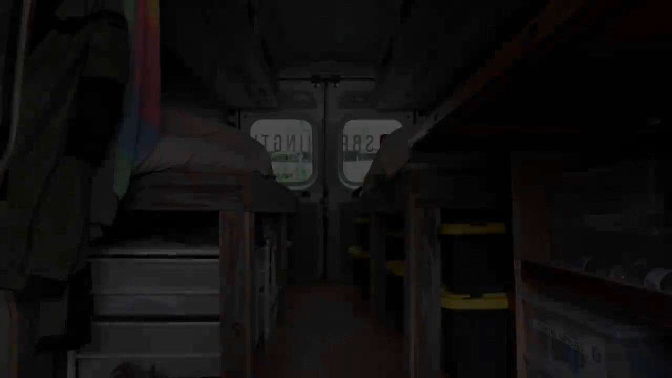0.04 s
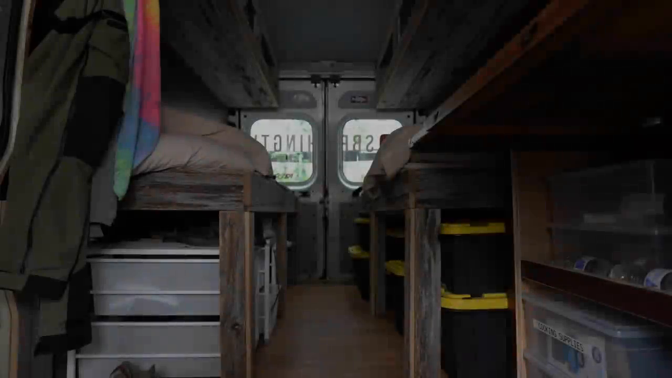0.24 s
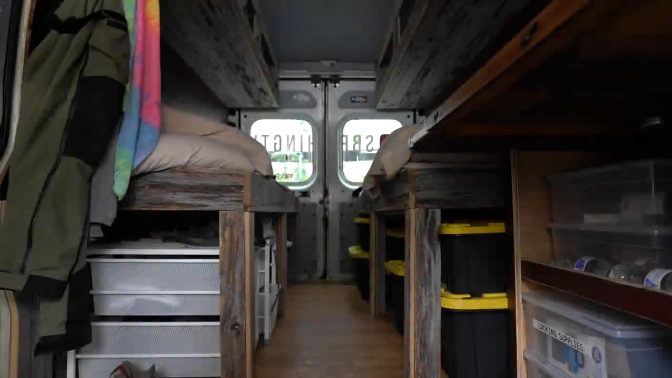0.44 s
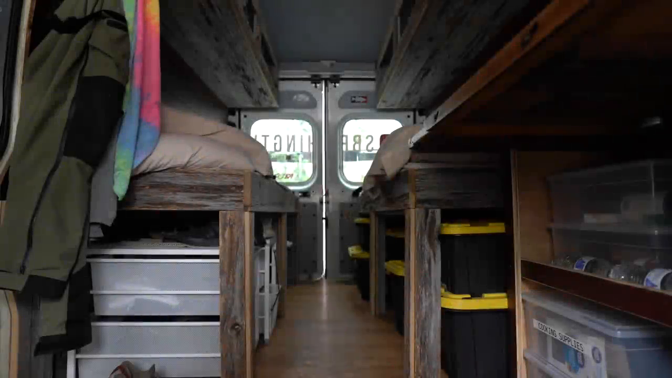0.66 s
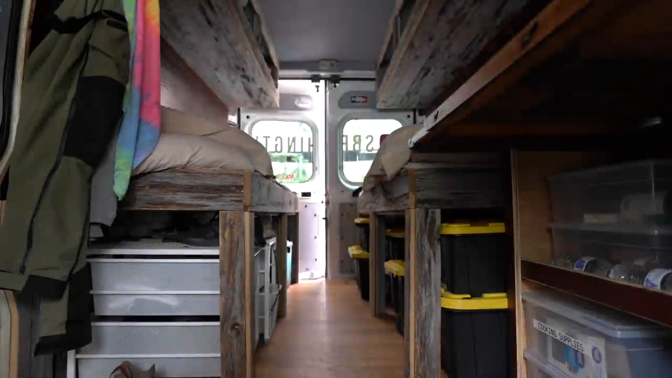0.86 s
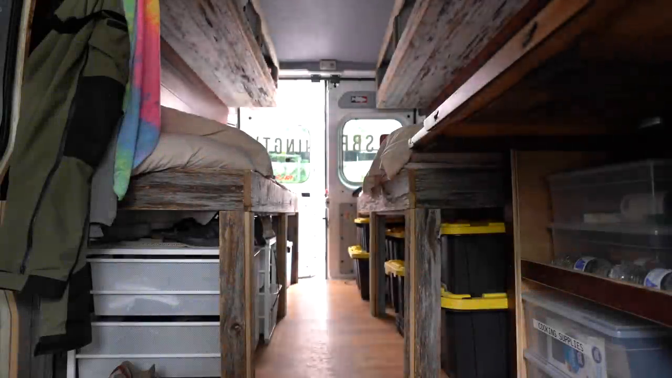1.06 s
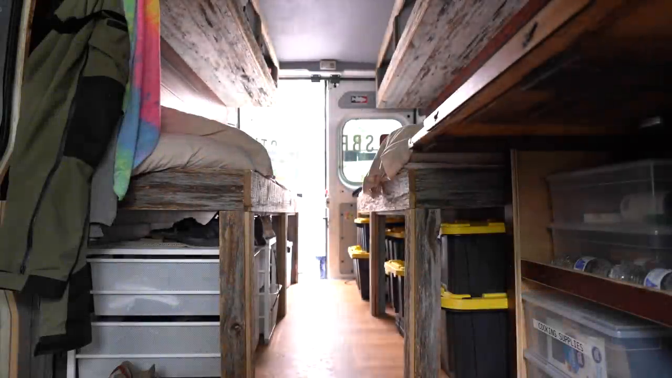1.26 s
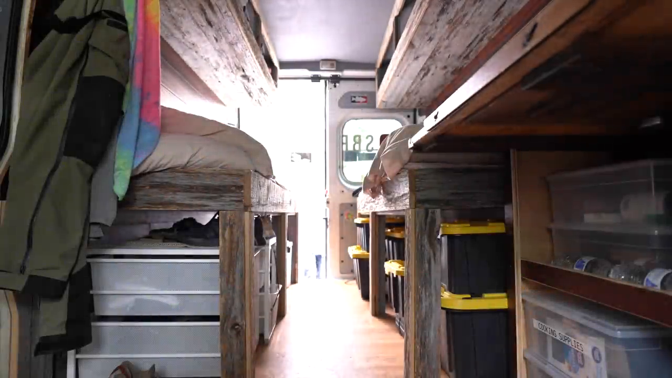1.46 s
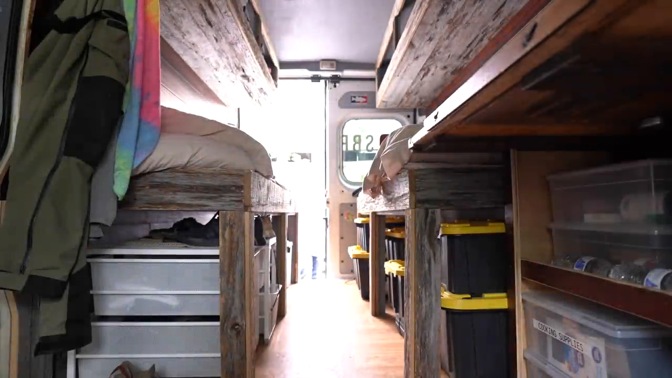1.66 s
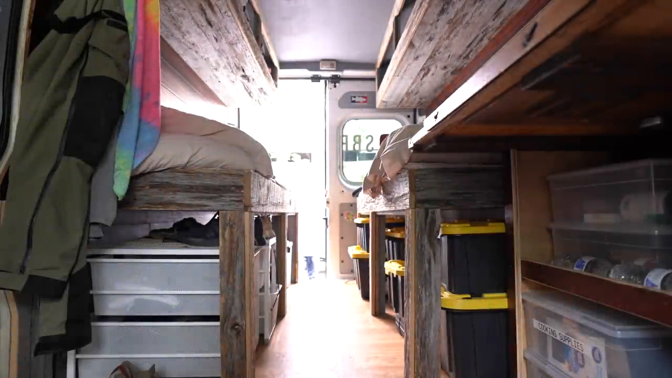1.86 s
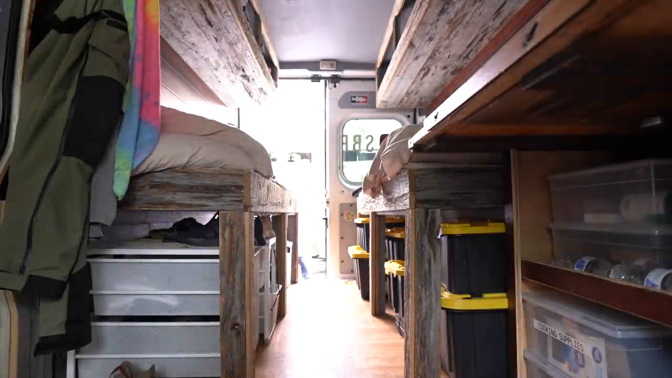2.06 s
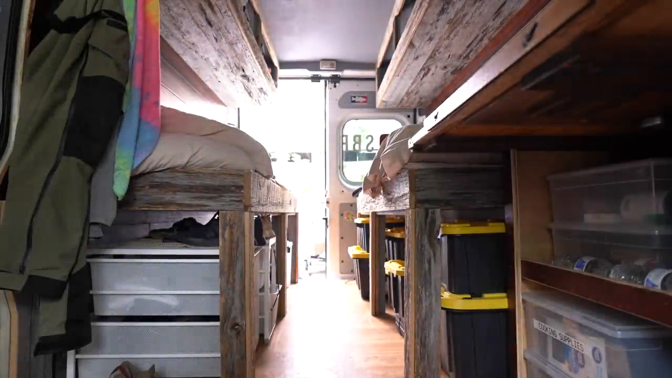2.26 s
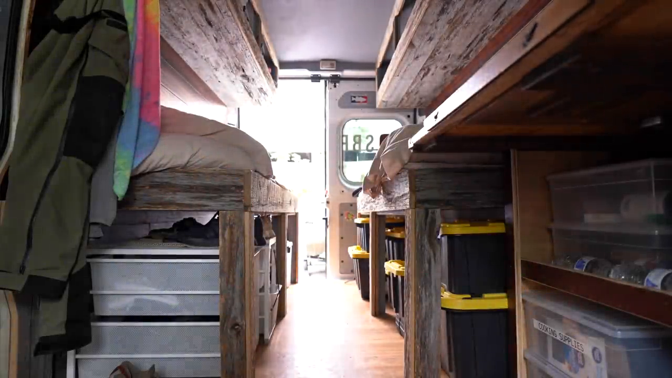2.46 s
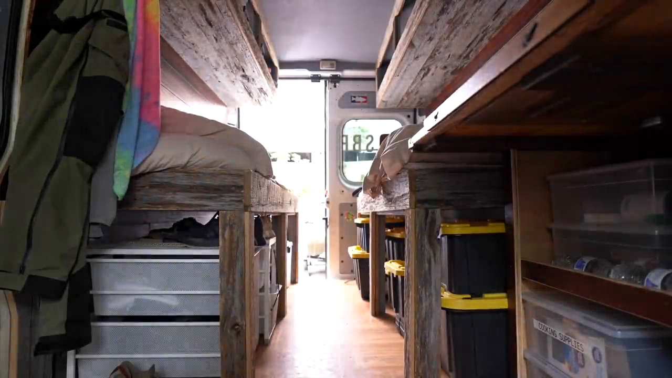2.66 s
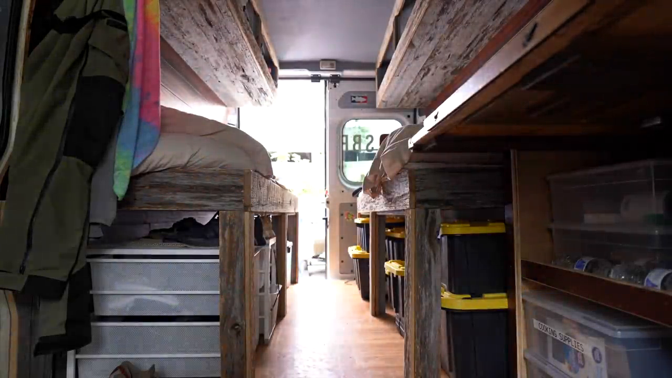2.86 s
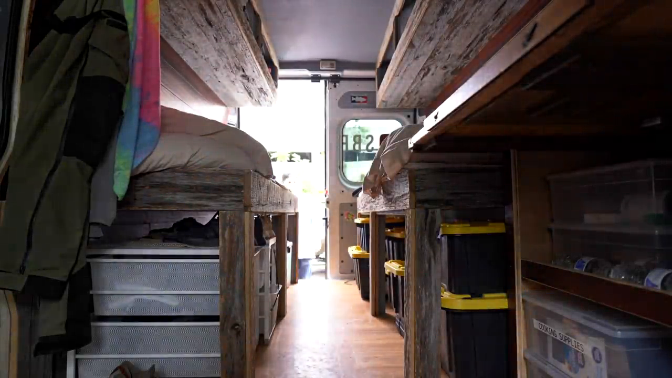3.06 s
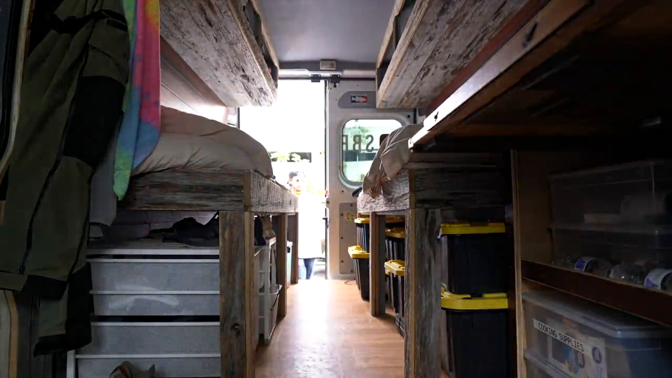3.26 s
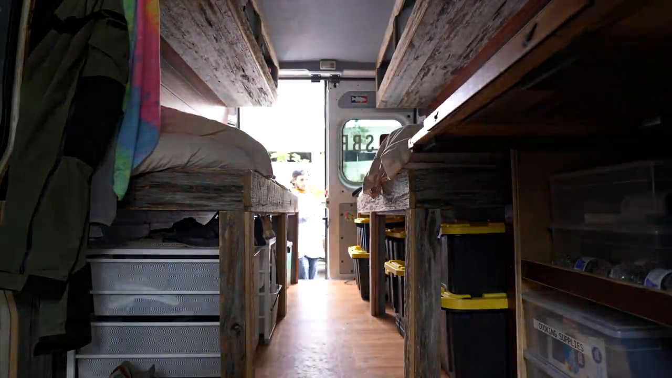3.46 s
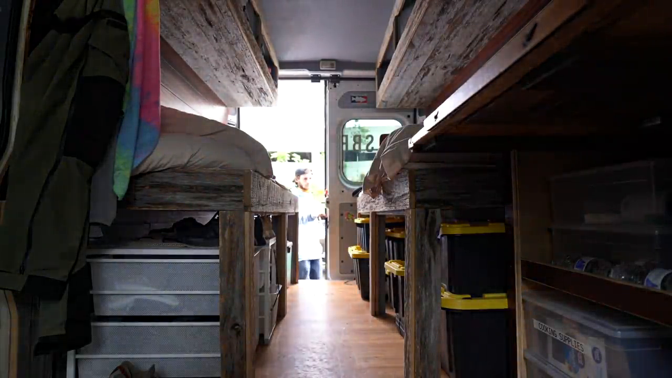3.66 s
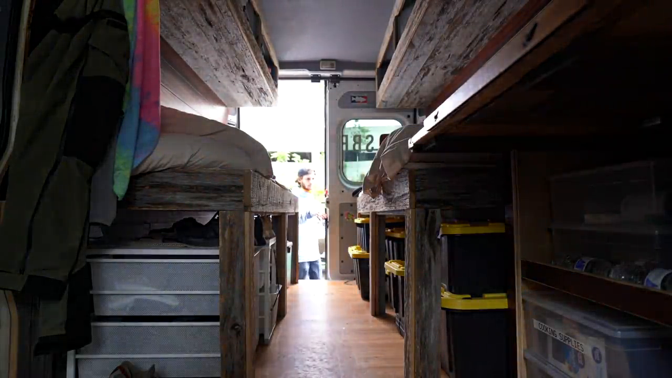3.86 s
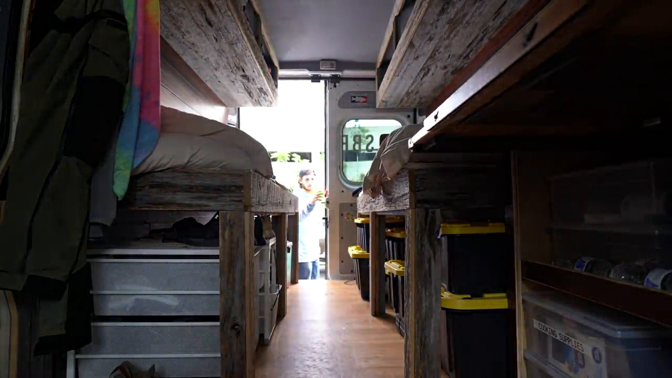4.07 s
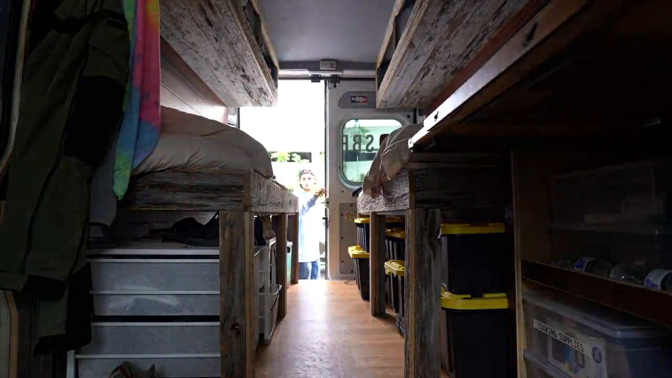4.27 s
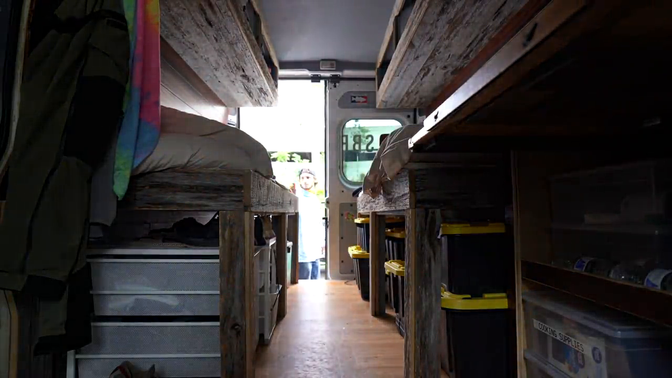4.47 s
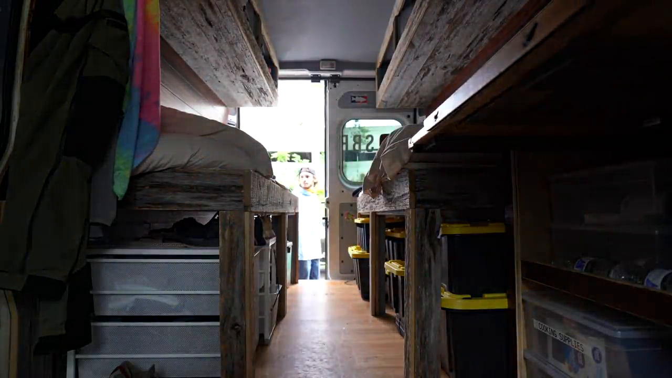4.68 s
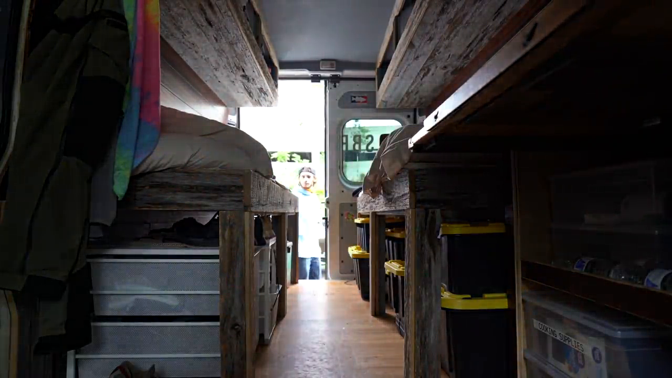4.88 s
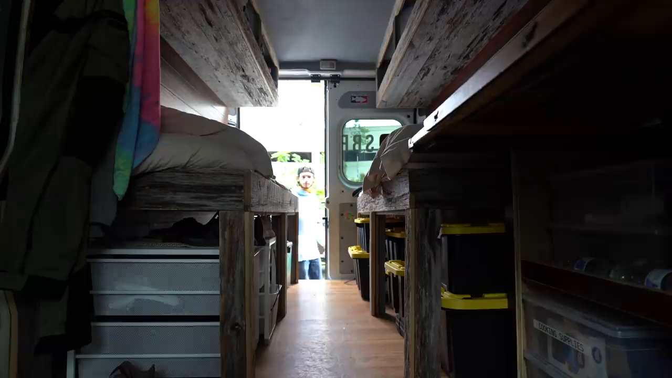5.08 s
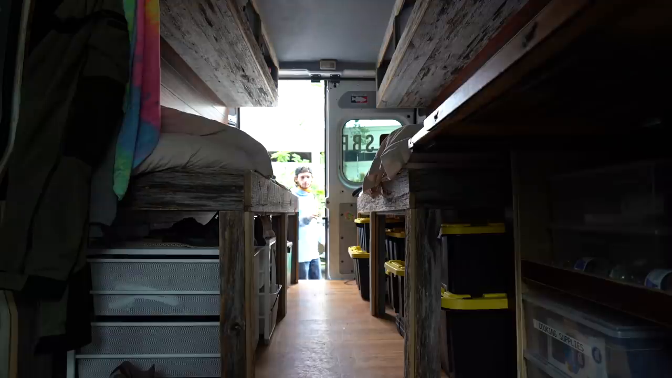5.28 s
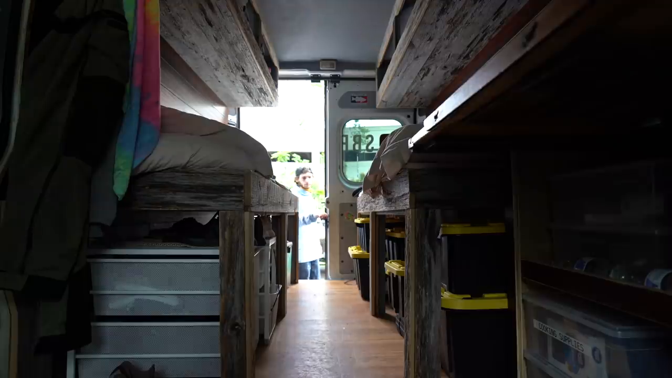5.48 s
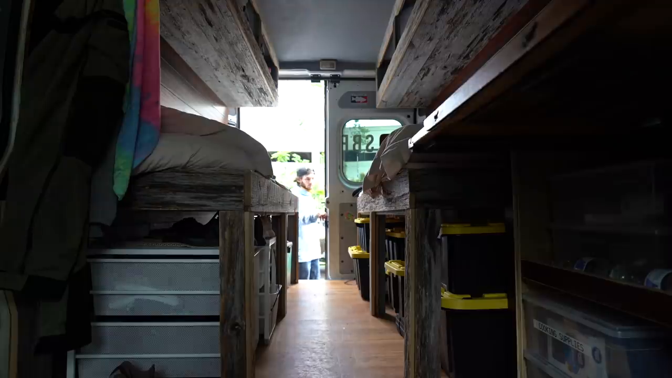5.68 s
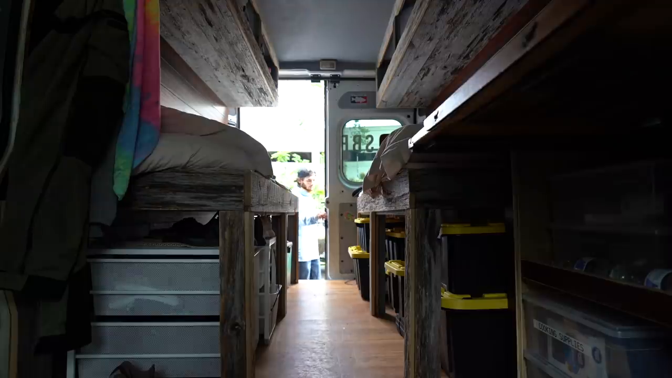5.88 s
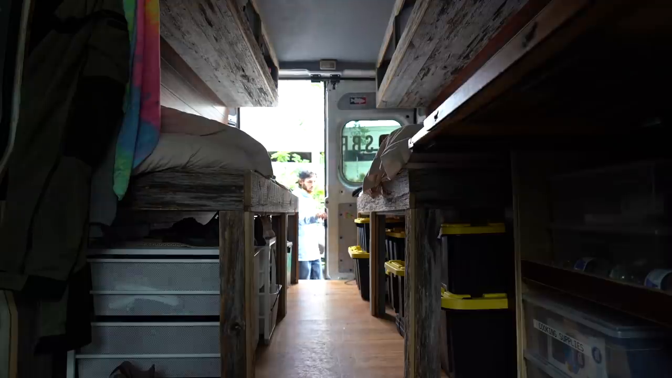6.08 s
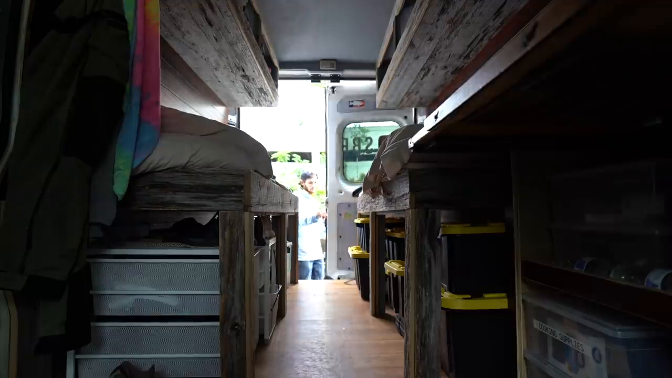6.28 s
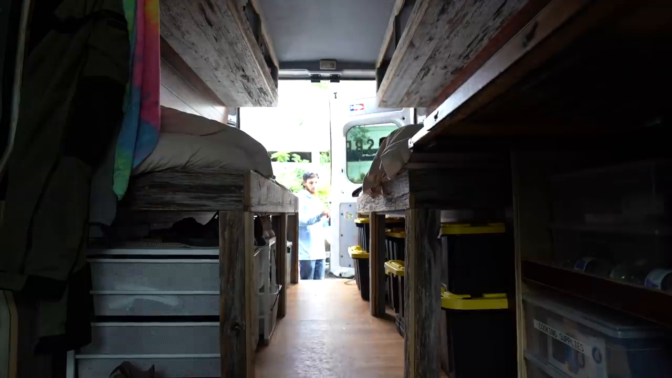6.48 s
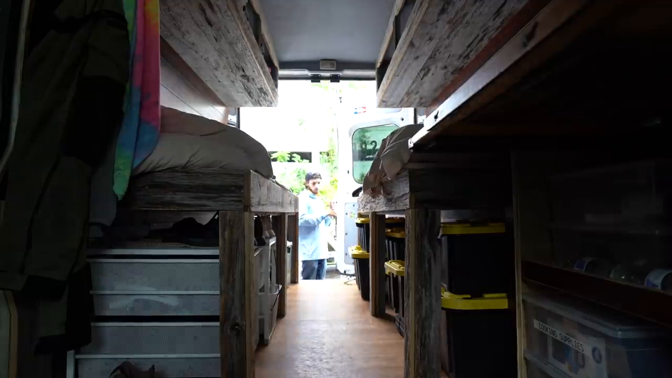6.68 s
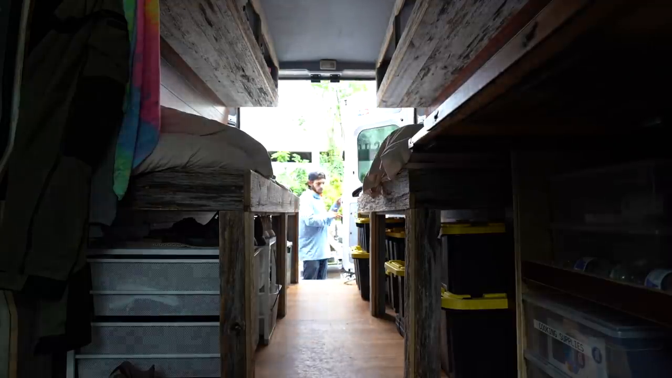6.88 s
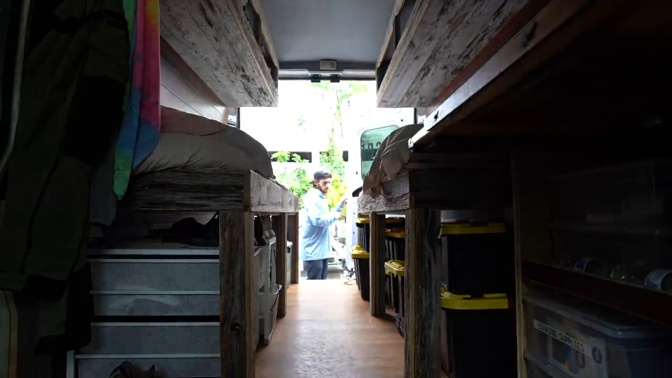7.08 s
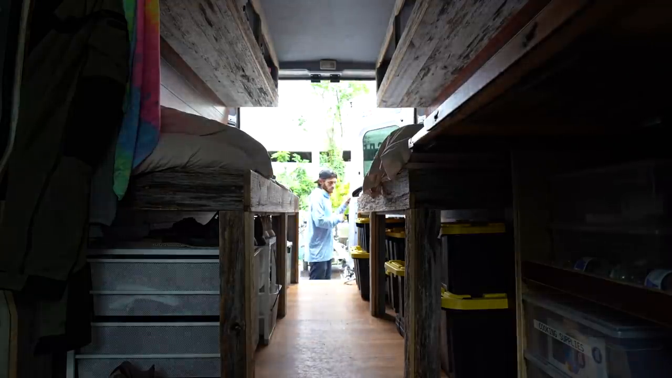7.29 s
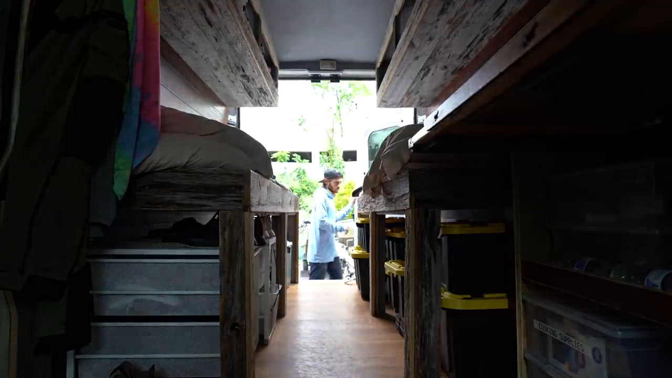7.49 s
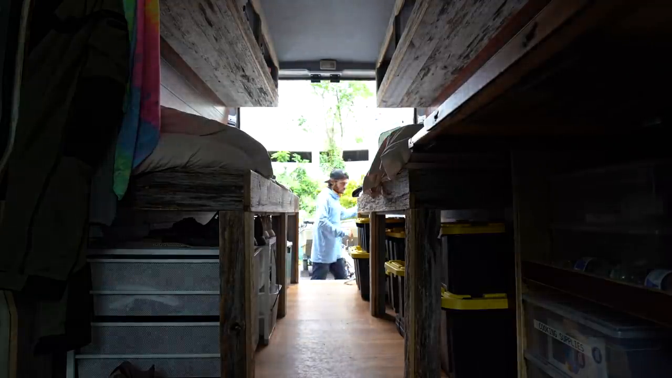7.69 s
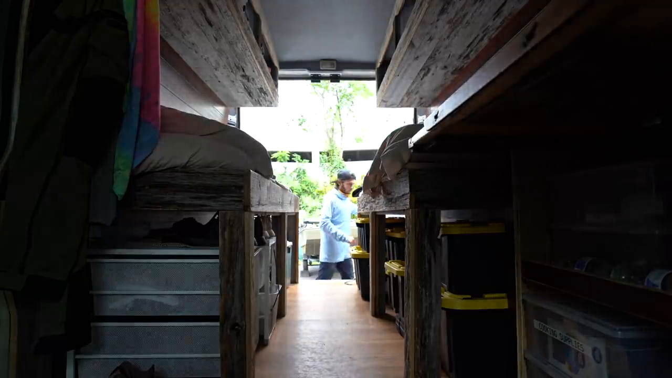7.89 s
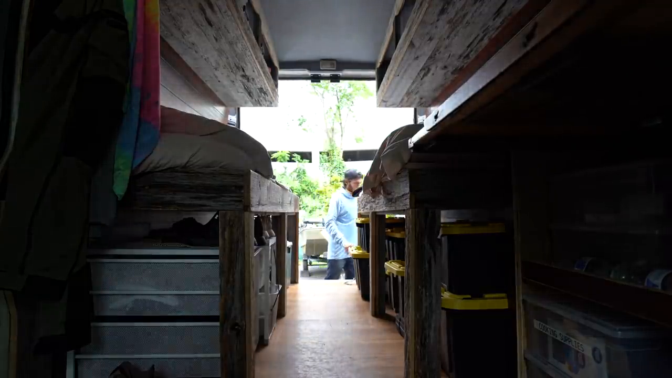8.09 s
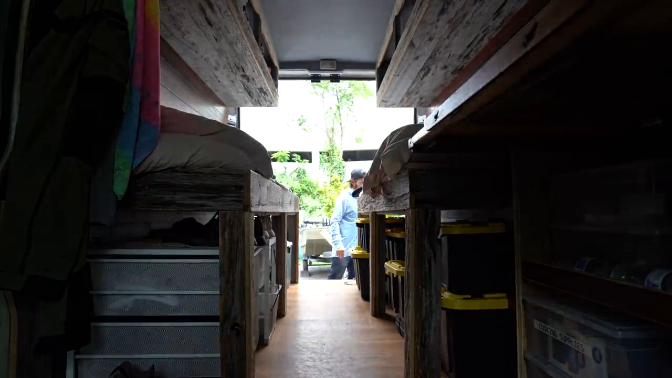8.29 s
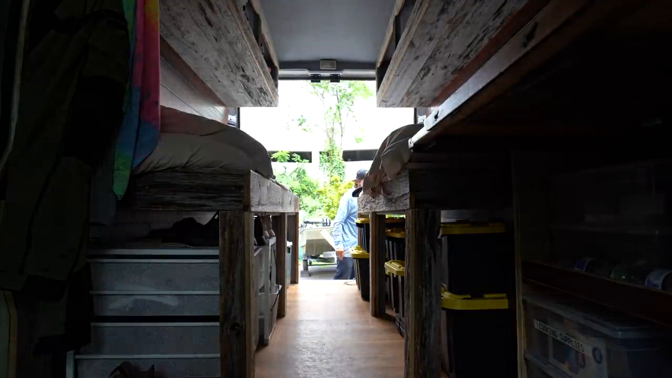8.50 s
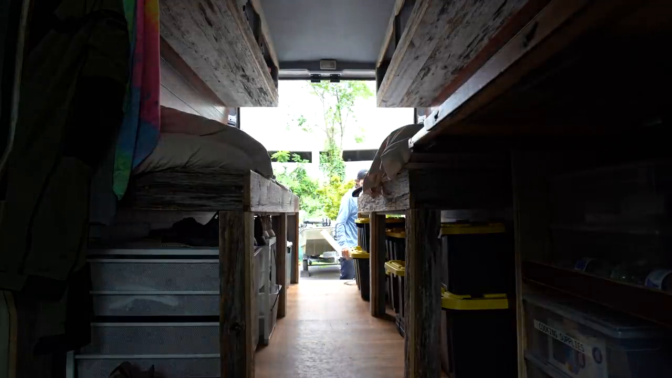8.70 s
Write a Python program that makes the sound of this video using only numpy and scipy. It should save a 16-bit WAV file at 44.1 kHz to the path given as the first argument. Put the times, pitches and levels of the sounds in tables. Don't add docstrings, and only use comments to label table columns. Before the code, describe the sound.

A fixed microphone deep inside a parked van catches two sheet-metal doors being opened from outside. Faint ticks build to a sharp latch clang and deep panel boom, then a looser rattle during the swing. Distant rumble, traffic and a thin insect hiss enter. Several quiet seconds hold only tiny knocks and scuffs. A second bright latch clunk comes, then three quick heavy slams with ringing metal, dying chatter, moving cloth and gritty steps.

```python
import sys
import numpy as np
from scipy import signal
from scipy.fft import rfft, irfft, next_fast_len
from scipy.io import wavfile
from scipy.ndimage import map_coordinates

SR = 44100
rng = np.random.default_rng(int(sys.argv[2]) if len(sys.argv) > 2 else 0)


def materialize(psi):
    bounded = np.clip(np.atleast_2d(psi).T, -1, 1)
    quanta = np.round(bounded * 32767).astype(np.int16)
    wavfile.write(sys.argv[1], SR, quanta)


def volts_from_decibels(level):
    exponent = np.asarray(level, float) / 20
    return 10 ** exponent


N = 385683

# (t/s, latch clang level/dB, panel thud level/dB, rattle level/dB)
FIRST_LATCH_BLOWS = [(0.242, -54.5, -42.5, -57), (0.294, -64.5, -58, -61), (0.4, -42.5, -40.5, -53.5),
                     (0.5, -50, -35, -67), (0.584, -38, -30.5, -38), (0.636, -34, -36, -43),
                     (0.651, -28, -34, -37), (0.662, -20.5, -38, -22.5), (0.692, -9.5, -14, -22.5),
                     (0.718, -38, -27, -50), (0.763, -31, -49, -36), (0.81, -42.5, -38.5, -40),
                     (0.885, -50, -38, -68)]
# (t/s, latch clang level/dB, panel thud level/dB, rattle level/dB)
FIRST_SWING_BLOWS = [(1.265, -39, -56, -43), (1.307, -43, -57, -63), (1.331, -38, -40, -52),
                     (1.409, -33, -34, -42.5), (1.439, -36, -49, -52), (1.482, -28.5, -37, -20.5),
                     (1.499, -23, -19, -37), (1.687, -36, -37, -51), (1.889, -68, -40, -68),
                     (1.92, -59, -49, -57), (2.01, -57, -48, -65), (2.082, -34, -34, -53),
                     (2.109, -76, -57, -74)]
# (t/s, latch clang level/dB, panel thud level/dB, rattle level/dB)
SECOND_LATCH_BLOWS = [(5.019, -57, -43.5, -75.5), (5.419, -67, -49.5, -71), (5.709, -31.5, -31, -37),
                      (5.732, -38, -29, -48), (5.772, -41, -33, -48), (5.813, -9.5, -16.5, -9.5),
                      (5.886, -31, -30.5, -38), (5.986, -38, -37.5, -53), (5.999, -33, -40.5, -43),
                      (6.052, -43, -44.5, -54.5), (6.078, -44, -47.5, -57), (6.147, -43, -45.5, -59)]
# (t/s, latch clang level/dB, panel thud level/dB, rattle level/dB)
DOOR_STOP_BLOWS = [
    (6.298, -4, -12, -11.5),
    (6.321, -19, -30.5, -34),
    (6.372, -2.5, -11, -13.5),
    (6.395, -18, -30, -32),
    (6.457, -4, -14, -13.5),
    (6.479, -20, -28.5, -34),
]
# (t/s, latch clang level/dB, panel thud level/dB, rattle level/dB)
LIGHT_KNOCKS = [(2.759, -63, -58, -52), (2.901, -52.5, -64, -70), (3.411, -47, -50.5, -62),
                (3.448, -44, -70, -52), (4.305, -41, -47, -47), (6.911, -45.5, -49, -48),
                (7.159, -50, -45, -62), (7.194, -47, -56, -54), (7.228, -40, -42.5, -40.5)]
# (t/s, latch clang level/dB, panel thud level/dB, rattle level/dB)
ROD_CHATTER = [(6.555, -44, -35, -54), (6.6, -46, -37, -52), (6.616, -42, -36, -47), (6.653, -45, -48, -46),
               (6.687, -52, -55, -46), (6.72, -50, -58, -48), (6.735, -46, -60, -58),
               (6.768, -50, -60, -52), (6.81, -54, -60, -54)]
# (f/Hz, level/dB, t60/s)
FIRST_DOOR_MODES = [(49.2, -1, 0.53), (66, -20, 0.28), (83.4, 4.5, 0.4), (128, 2, 0.13),
                    (169.7, -2.5, 0.63), (230, -4.5, 0.22), (370, 0, 0.16), (450, 6, 0.092),
                    (510, -2, 0.33), (700, -1, 0.098), (848, -10, 0.16), (999, -5.5, 0.079),
                    (1187, 1, 0.048), (1400, 0.5, 0.044), (1720, -3.5, 0.023), (2105, -12.5, 0.11),
                    (2286, -14, 0.11), (2650, -8, 0.059), (2943, -8.5, 0.14), (3100, -1, 0.023),
                    (3430, 0.5, 0.034), (3690, 1.5, 0.03), (4140, -12, 0.045)]
# (f/Hz, level/dB, t60/s)
FIRST_SWING_MODES = [(58, -3, 0.3), (83.4, 1, 0.3), (179.8, -2, 0.465), (307, 2.5, 0.21), (401, 4, 0.11),
                     (458, 0.5, 0.22), (686, -2, 0.11), (977, -12, 0.17), (1180, -2, 0.078),
                     (1404, -3, 0.064), (1530, -0.5, 0.052), (1740, -8, 0.046), (1980, -9, 0.065),
                     (2170, -7, 0.062), (2450, -11, 0.049), (2680, -10, 0.043), (3230, -1, 0.041),
                     (3390, -22, 0.051), (3460, 8, 0.024), (3950, 2, 0.03), (4250, -8, 0.052),
                     (4540, -9, .07)]
# (f/Hz, level/dB, t60/s)
SECOND_DOOR_MODES = [(56.8, 4, 0.62), (73.8, 1, 0.52), (109, 1, 0.3), (166.4, 2, 0.16), (249.7, -8.5, 0.16),
                     (314, -1.5, 0.18), (402, -2.5, 0.16), (670, -7, 0.1), (899, -2, 0.073),
                     (1116, -4.5, 0.1), (1370, -2.5, .1), (1807, -4.5, 0.058), (2160, -9, 0.15),
                     (2390, -13, 0.05), (2904, 2.5, .06), (3250, 2, 0.036), (3500, 3, 0.028),
                     (3773, -1.5, 0.092), (4170, -12.5, 0.069), (4640, -12.5, 0.079)]
# (f/Hz, level/dB, t60/s)
DOOR_STOP_MODES = [(60, -6, 0.34), (83.8, -4, 0.4), (125, -7, 0.23), (164.3, -10, 0.33),
                   (213.4, -7.5, 0.49), (252.2, 2.5, 0.37), (374.8, -3, .25), (500, -13, .15),
                   (662, -22.5, 0.39), (950, -10.5, 0.19), (1217, -10, 0.19), (1316, -6.5, .1),
                   (1400, -1, 0.077), (1490, -7, 0.14), (1660, -7.5, 0.12), (1800, -9, .08),
                   (1850, -3, 0.018), (2008, -5.5, 0.081), (2100, -1, 0.057), (2188, -7.5, .1),
                   (2298, -7, 0.064), (2880, 2.5, 0.052), (3100, -8.5, 0.09), (3310, 0, 0.0359),
                   (3700, -8, 0.062), (3830, -7.5, .1), (4570, -11.5, .1)]
# (low f/Hz, high f/Hz, contact/s, tail t60/s, tail level/dB)
BLOW_PARTS = [
    (601.6, 2550, .004, 0.24, -13),
    (29.86, 140, 0.0075, 0.65, -13),
    (144, 461, 0.006526, 0.38, -6.5),
    (2557, 4800, 0.0036, 0.2, -10),
    (5200, 12000, 0.0033, 0.041, -3.5),
]
# (t/s, peak level/dB, f/Hz, t60/s)
SMALL_PART_PINGS = [(0.402, -51, 1590, 0.06), (.402, -48, 780, .06), (.592, -45, 2960, 0.054),
                    (.665, -30, 1400, .05), (.672, -35, 3700, .03), (.692, -27, 3370, 0.033),
                    (.701, -30, 3500, .04), (.745, -41, 3480, .05), (1.432, -43, 2345, .05),
                    (1.485, -36, 4300, .04), (1.487, -34, 1610, .04), (1.498, -33, 4200, .05),
                    (1.501, -31, 1200, 0.047), (5.71, -42, 2100, .04), (5.775, -45.5, 3500, 0.043),
                    (5.836, -26.5, 3410, .08), (.882, -48, 1700, .05), (.896, -46, 1150, .05),
                    (1.92, -63, 4950, .06), (1.805, -61, 4100, 0.043), (2.083, -46, 2750, .04),
                    (2.083, -50, 3500, .04), (6.148, -47, 1950, .05), (5.826, -24, 1100, .06),
                    (7.228, -50, 1400, .05), (7.06, -54, 3000, .05), (7.746, -50, 3740, .08),
                    (7.765, -50, 3700, .06), (2.011, -47, 750, .04), (.765, -37, 4300, 0.051),
                    (0.811, -34, 3400, 0.029), (1.413, -42, 2390, 0.05), (2.009, -48, 450, .06),
                    (2.082, -31, 1660, 0.025), (2.757, -59, 3750, 0.055), (2.902, -46, 766, 0.047),
                    (3.412, -47, 700, 0.12), (4.305, -53, 3770, .04), (5.817, -11.5, 2970, 0.033),
                    (5.816, -15, 3750, 0.035), (6.688, -52.5, 5040, .02), (6.72, -51, 5200, 0.021),
                    (6.912, -43, 4140, 0.031), (7.15, -45, 347, .08), (7.171, -46, 480, .06),
                    (7.194, -40, 700, 0.051), (7.761, -47.5, 478, 0.19), (7.229, -45.5, 4000, .04)]
# (t/s, peak level/dB, f/Hz, t60/s)
STOP_ARM_PINGS = [(6.295, -32, 1210, .033), (6.295, -17.5, 330, .057), (6.304, -6, 2100, .03),
                  (6.304, -11, 1290, .08), (6.316, -17, 1450, .1), (6.326, -15, 1330, .08),
                  (6.31, -21, 945, .13), (6.316, -20, 2170, .12), (6.34, -24, 520, .1),
                  (6.377, -5, 2050, .03), (6.379, -9, 1350, .04), (6.4, -13, 1340, .09),
                  (6.385, -21, 945, .13), (6.395, -24, 2150, .1), (6.44, -26, 450, .1),
                  (6.463, -4.5, 1430, .04), (6.463, -11, 2100, .05), (6.484, -16, 1400, .08),
                  (6.468, -22, 940, .12), (6.48, -26, 2150, .1), (6.49, -24, 490, .15)]
# (t/s, peak level/dB, f/Hz, t60/s)
PANEL_BOOMS = [(.697, -13, 124.6, .15), (.721, -8.5, 72, 0.29), (.755, -22, 48, 0.71),
               (1.5, -22.5, 84, 0.36), (5.822, -13.5, 82, .3), (5.86, -19, 41, 0.67), (6.303, -8, 67, .25),
               (6.377, -8, 71, .28), (6.46, -11, 66, .22), (6.31, -22, 215, .3), (6.385, -20, 217, .3),
               (6.47, -21, 165, .3), (6.505, -24, 210, .2), (6.51, -26, 370, .15), (6.56, -30, 125, .3),
               (5.72, -36, 300, .15), (5.775, -36, 330, .15), (5.89, -34, 600, .1), (2.09, -42, 230, .2),
               (6.3, -18, 40, .6), (6.57, -30, 33, .6), (6.6, -34, 300, .15), (1.505, -20, 400, .12),
               (1.512, -22, 500, .12), (1.52, -24, 320, .2), (1.89, -42, 290, .2), (7.23, -46, 260, .15),
               (7.79, -46, 250, .15), (6.305, -20, 254, .3), (6.379, -19, 256, .3),
               (6.462, -17.5, 250, 0.35), (6.305, -21, 372, .28), (6.379, -22.5, 340, .28),
               (6.462, -20.5, 364, .28), (6.57, -31, 90, .5), (5.415, -41.5, 335, 0.21),
               (6.5, -49, 296, .08), (5.575, -50, 335, .12), (0.19, -45, 130, .3), (.503, -34.5, 390, 0.16),
               (.41, -41, 520, .12)]
# (t/s, level/dB, half-length/s, low body level/dB, top hiss level/dB)
SHOE_SCUFFS = [(2.562, -70.5, 0.036, 10, 2), (3.461, -57.5, 0.059, 4.5, -31), (3.635, -67.5, 0.1, 6.5, -15),
               (4.264, -64.5, 0.046, -5, -8), (4.301, -65.5, 0.035, 12.5, -8), (4.514, -72, .04, -1, -15),
               (4.585, -67.5, 0.048, -12, -12), (7.003, -61.5, .03, -11, -12),
               (7.071, -56.5, 0.034, -18, -11), (7.185, -76.5, 0.054, 9, -5.5),
               (7.233, -65.5, 0.055, 13.5, -5), (7.453, -63, 0.034, 5, -6), (7.544, -55, 0.05, -0.5, -8),
               (7.642, -59, 0.054, 0, -5), (7.757, -49, 0.049, 0, -3), (7.857, -64.5, 0.16, 0, -9),
               (8.65, -71.5, 0.067, 5, -13.5)]
# (f/Hz, level/dB per Hz)
RUMBLE_SPECTRUM = [(12, -44.5), (20, -13), (35, -3), (54, 6), (65, 3.5), (123, -11), (145, -25.5),
                   (160, -20.5), (210, -49.5), (350, -120)]
# (f/Hz, level/dB per Hz)
DRONE_SPECTRUM = [(76, -26.5), (130, -1.5), (194, -11), (305, -13.5), (382, -14.5), (461, -16.5),
                  (1080, -21), (2600, -35), (3380, -62.5), (5720, -120)]
# (f/Hz, level/dB per Hz)
RUSTLE_SPECTRUM = [(1180, -16), (2000, -1), (2530, -11), (2790, -2.5), (3020, -1.5), (3930, -3),
                   (4840, -14), (5600, -15.5), (7280, -33), (12300, -120)]
# (f/Hz, level/dB per Hz)
SELF_NOISE_SPECTRUM = [(1500, 1), (5000, -0.5), (9000, -1), (13000, -1.5), (15500, -1.5)]
# (t/s, level/dB)
FADE_IN_CURVE = [(0, -25), (.1, -13.5), (.3, -3), (.6, 2), (.9, 3.5), (8.75, 4.5)]
# (t/s, level over stillness/dB)
MOVEMENT_CURVE = [(0.92, 8.5), (1.41, 18), (1.83, 13.5), (2.14, 0), (3.53, 1.5), (4.26, -2.5), (5.77, 1.5),
                  (5.92, 14), (6.11, 6), (6.33, 9), (6.6, 19.5), (7.19, 8.5), (7.48, 10), (7.7, 18),
                  (7.92, 12), (8.4, 3)]
# (start t/s, swing time/s, share of the opening)
DOOR_OPENINGS = [
    (.62, 0.4, 0.78),
    (6.1, 0.43, 0.15),
]
# (t/s, rumble level/dB, drone level/dB, t60/s)
BODY_SHUDDERS = [(.64, -60, -25, 0.37), (.71, -19, -41.5, 0.71), (1.7, -45, -46.5, 0.95),
                 (1.86, -34.5, -64, 1.7), (4.25, -34.5, -62, 0.26), (5.83, -27.5, -28.5, 0.31),
                 (6.3, -35.5, -59.5, 1), (6.44, -38.5, -26.5, 0.33), (6.56, -33, -53, 0.73),
                 (7.43, -41.5, -73, 0.66)]


def rms_one(x):
    return x / np.sqrt(np.mean(x ** 2) + 1e-20)


def curve(rows):
    times, levels = np.transpose(rows)
    return np.interp(np.arange(N) / SR, times, levels)


def band(x, low_hz, high_hz, order=2):
    return signal.sosfilt(signal.butter(order, [low_hz, high_hz], "band", fs=SR, output="sos"), x)


def drift(rate_hz):
    knots = rng.standard_normal(int(N / SR * rate_hz * 2) + 4)
    places = np.linspace(1, len(knots) - 2, N // 64 + 1)
    return map_coordinates(knots, [places], order=3).repeat(64)[:N]


def decay(clicks, t60):
    return signal.lfilter([1], [1, -volts_from_decibels(-60 / (t60 * SR))], clicks + 1e-18)


def ring(force, hz, t60):
    radius, angle = volts_from_decibels(-60 / (t60 * SR)), 2 * np.pi * hz / SR
    feedback = [1, -2 * radius * np.cos(angle), radius * radius]
    return signal.lfilter([0, np.sin(angle)], feedback, force + 1e-18)


def coloured(spectrum, patchy_db):
    size = next_fast_len(N)
    hz = np.maximum(np.arange(size // 2 + 1) * SR / size, 1)
    points_hz, points_db = np.transpose(spectrum)
    shape = volts_from_decibels(np.interp(np.log(hz), np.log(points_hz), points_db, left=-80, right=-80))
    noise = irfft(rfft(rng.standard_normal(size)) * shape, size)[:N]
    return rms_one(noise * volts_from_decibels(patchy_db * drift(8.3)))


def shudder(column):
    t, out = np.arange(N) / SR, 0
    rise_s = 0.044
    for row in BODY_SHUDDERS:
        since = np.maximum(t - row[0], 0)
        dying = volts_from_decibels(row[column] - 60 * np.maximum(since - rise_s, 0) / row[3])
        out = out + dying * np.minimum(since / rise_s, 1)
    return out


def air_gain(still_db, movement_share, shut_db):
    t = np.arange(N) / SR
    opening = sum(share * np.clip((t - s) / swing, 0, 1) for s, swing, share in DOOR_OPENINGS)
    fade = volts_from_decibels(np.minimum(curve(FADE_IN_CURVE), 0))
    level = volts_from_decibels(still_db + movement_share * curve(MOVEMENT_CURVE))
    return fade * level * (opening + volts_from_decibels(shut_db) * (1 - opening))


def outdoors():
    rumble_gain = np.hypot(air_gain(-45.5, movement_share=0.17, shut_db=-4.5), shudder(column=1))
    drone_gain = np.hypot(air_gain(-55.5, movement_share=0.23, shut_db=-14), shudder(column=2))
    rustle_gain = air_gain(-74.5, movement_share=0.91, shut_db=-16)
    insect_gain = air_gain(-74.5, movement_share=.05, shut_db=-3.5)
    unscreened = np.clip((np.arange(N) / SR - 1.15) / .45, .15, 1)
    insects = rms_one(band(rng.standard_normal(N), 6270, 7420, order=3)) * volts_from_decibels(.8 * drift(12))
    out = rumble_gain * coloured(RUMBLE_SPECTRUM, patchy_db=.8)
    out = out + drone_gain * coloured(DRONE_SPECTRUM, patchy_db=.7)
    out = out + rustle_gain * coloured(RUSTLE_SPECTRUM, patchy_db=1.1)
    return out + insect_gain * unscreened * insects


def booms():
    out, t = np.zeros(N), np.arange(SR // 2) / SR
    for s, peak_db, hz, t60 in PANEL_BOOMS:
        start = int(s * SR)
        rise = np.minimum(2 * t * hz, 1)
        out[start:start + len(t)] += volts_from_decibels(peak_db - 60 * t / t60) * rise * np.sin(2 * np.pi * hz * t)
    return out


def part_levels(table, boom_db, crack_db):
    s, clang, thud, rattle = np.transpose(table)
    return np.transpose([s, clang, thud + boom_db, thud, rattle, rattle + crack_db])


def contact_force(clicks, hz):
    soft = np.hanning(int(SR / hz) + 3)
    hit, force = np.flatnonzero(clicks)[:, None], np.zeros(len(clicks) + len(soft))
    np.add.at(force, hit + np.arange(len(soft)), clicks[hit] * 4 * soft / soft.sum())
    return force[:len(clicks)]


def struck_mode(size, late, strength, contact, hz, t60):
    clicks = np.zeros(size)
    delay = int(rng.random() * 1.6 * contact * SR)
    clicks[late + delay] = strength * rng.choice([-1, 1])
    bounce = late + (rng.uniform(.005, .028, len(late)) * SR).astype(int)
    clicks[bounce] += 0.5 * strength * rng.uniform(-0.97, 1, len(late))
    return ring(contact_force(clicks, hz), hz, t60)


def blows(table, modes, damping, tail_trim_db, scatter_db, lag, sheen_db, air=0.92):
    rows = np.array(table)
    start = int(rows[0, 0] * SR) - 199
    size = min(int((rows[-1, 0] + 1) * SR), N) - start
    at = ((rows[:, 0] - .002) * SR).astype(int) - start
    out = np.zeros(N)
    for k, (low_hz, high_hz, contact, t60, tail_db) in enumerate(BLOW_PARTS):
        is_crack = low_hz > 5000
        late = at + int(lag * SR) * (low_hz > 500)
        levels = rows[:, k + 1]
        grit = volts_from_decibels(1.5 * rng.standard_normal(size // 99 + 1)).repeat(99)[:size]
        noise = rng.standard_normal(size) * grit
        tail = rms_one(band(noise, low_hz, high_hz, order=3))
        tail = tail + air * is_crack * rms_one(band(noise, 11000, 15700))
        sound = np.zeros(size)
        for hz, db, ring_t60 in modes:
            if not low_hz <= hz < high_hz:
                continue
            strength = volts_from_decibels(levels + db + scatter_db * rng.uniform(-0.9, 1, len(at)))
            sound += struck_mode(size, late, strength, contact, hz, ring_t60 * damping)
            tail = tail + volts_from_decibels(db) * rms_one(ring(noise, hz, 0.15 * ring_t60))
        clicks = np.zeros(size)
        clicks[late] = volts_from_decibels(levels)
        dying = decay(clicks, t60 * damping)
        dying = dying + is_crack * volts_from_decibels(sheen_db) * decay(clicks, 0.19)
        width = np.hanning(int(2 * contact * SR))
        swell = signal.oaconvolve(dying, width / width.sum())[:size]
        out[start:start + size] += 0.2 * sound + volts_from_decibels(tail_db + tail_trim_db) * swell * rms_one(tail)
    return out


def doors():
    out = blows(part_levels(FIRST_LATCH_BLOWS, boom_db=-1, crack_db=-12.0), FIRST_DOOR_MODES,
                damping=0.82, tail_trim_db=-1.0, scatter_db=4.0, lag=0.00121, sheen_db=-22)
    out += blows(part_levels(FIRST_SWING_BLOWS, boom_db=-5.0, crack_db=-9), FIRST_SWING_MODES,
                 damping=0.62, tail_trim_db=2.5, scatter_db=5.5, lag=0.000827, sheen_db=-21)
    knocks = part_levels(LIGHT_KNOCKS, boom_db=2.5, crack_db=-11)
    chatter = part_levels(ROD_CHATTER, boom_db=3.5, crack_db=-9)
    out += blows(sorted([*map(tuple, knocks), *map(tuple, chatter)]), FIRST_DOOR_MODES,
                 damping=0.53, tail_trim_db=-1.0, scatter_db=6.5, lag=0.001105, sheen_db=-30, air=.15)
    out += blows(part_levels(SECOND_LATCH_BLOWS, boom_db=-1.5, crack_db=-15.5), SECOND_DOOR_MODES,
                 damping=0.69, tail_trim_db=1.5, scatter_db=4.0, lag=0.00072, sheen_db=-22.5, air=0.68)
    out += blows(part_levels(DOOR_STOP_BLOWS, boom_db=-2.5, crack_db=-13.5), DOOR_STOP_MODES,
                 damping=0.7, tail_trim_db=-0.6, scatter_db=2.0, lag=0.0046, sheen_db=-16, air=.55)
    return out


def pings():
    out, t = np.zeros(N), np.arange(SR // 5) / SR
    for s, peak_db, hz, t60 in SMALL_PART_PINGS + STOP_ARM_PINGS:
        start = int(s * SR)
        pair = np.sin(2 * np.pi * hz * .97 * t) + np.sin(2 * np.pi * hz * 1.04 * t)
        rise = np.minimum(t * hz / 3, 1)
        out[start:start + len(t)] += volts_from_decibels(peak_db - 60 * t / t60) * rise * pair
    return out


def shoes():
    grains = rng.standard_normal(N) * volts_from_decibels(3.1 * np.minimum(rng.exponential(1, N), 3))
    middle = rms_one(band(grains, 1750, 4240)) + 0.29 * rms_one(ring(grains, 3900, 0.0094))
    low = rms_one(band(grains, 280, 2080))
    top = rms_one(band(grains, 5500, 13700))
    out = np.zeros(N)
    for s, level_db, length, low_db, top_db in SHOE_SCUFFS:
        stroke = np.hanning(int(2 * length * SR))
        start = int((s - length) * SR)
        cut = slice(start, start + len(stroke))
        mix = middle[cut] + volts_from_decibels(low_db) * low[cut] + volts_from_decibels(top_db) * top[cut]
        out[cut] += volts_from_decibels(level_db) * stroke[:len(mix)] * mix
    return out


def scene():
    return (outdoors() + booms() + doors() + pings() + shoes())[None]


def roll_off(x):
    return signal.sosfilt(signal.butter(12, 16650, fs=SR, output="sos"), x)


def record(dry):
    whine = volts_from_decibels(-89) * np.sin(2 * np.pi * 14150 * np.arange(N) / SR)
    hiss = volts_from_decibels(-74.5) * coloured(SELF_NOISE_SPECTRUM, patchy_db=.1)
    noise = (hiss + whine) * volts_from_decibels(curve(FADE_IN_CURVE))
    heard = signal.sosfilt(signal.butter(2, 30, "high", fs=SR, output="sos"), dry + noise)
    clipped = np.clip(heard, -.94, .94)
    heard = signal.sosfilt(signal.cheby2(10, 60, 16500, fs=SR, output="sos"), clipped)
    return roll_off(heard)


dry = scene()
out = record(dry)
materialize(out)
```